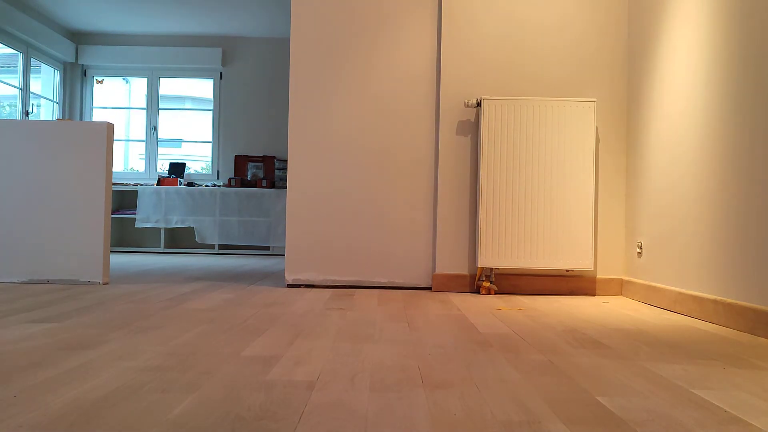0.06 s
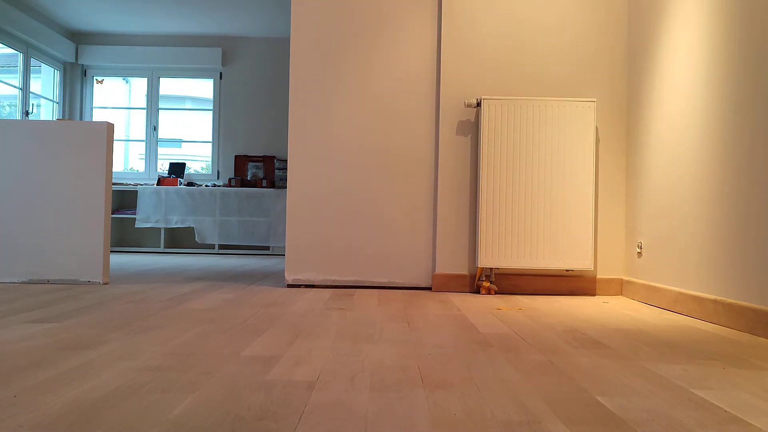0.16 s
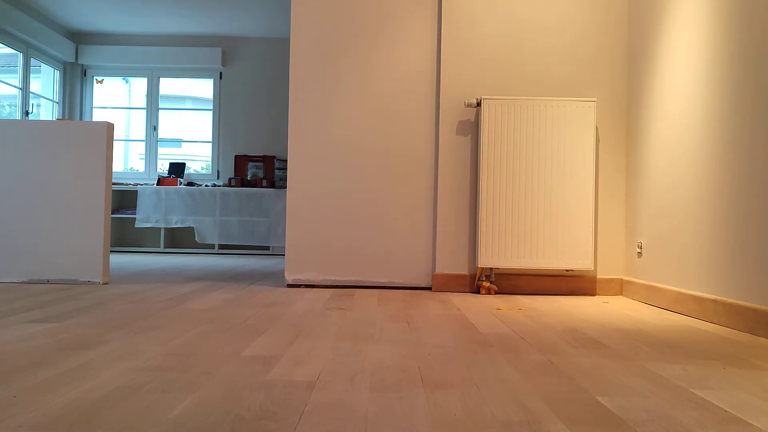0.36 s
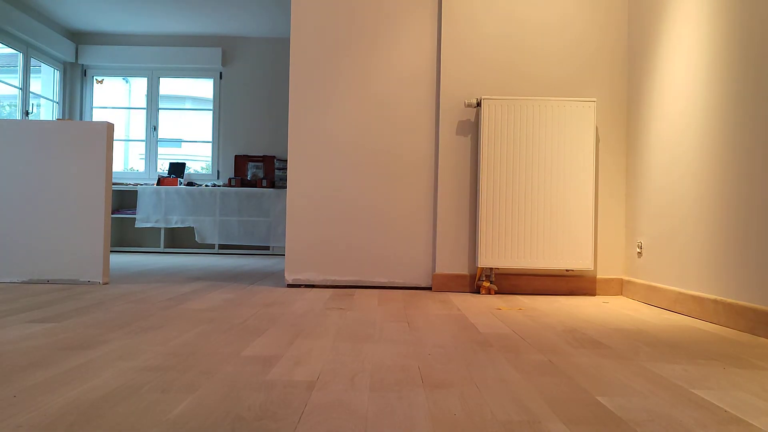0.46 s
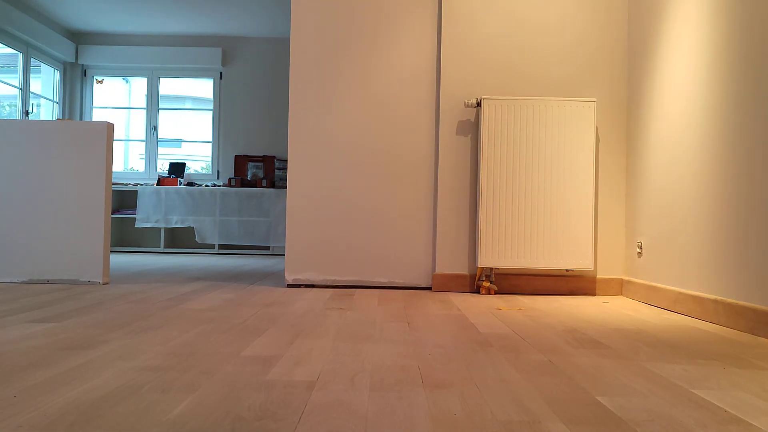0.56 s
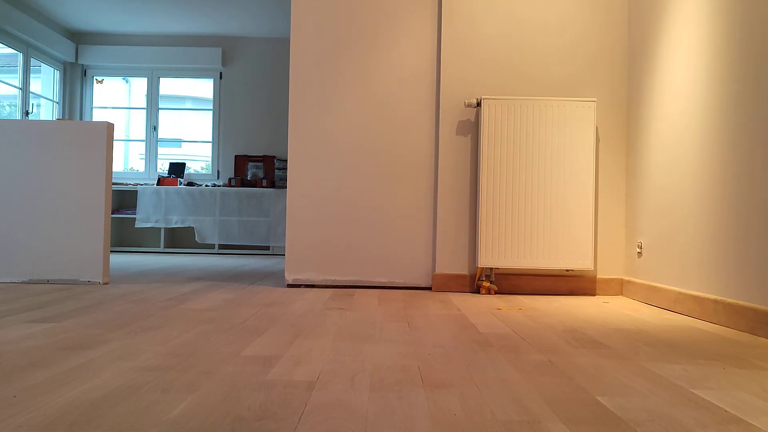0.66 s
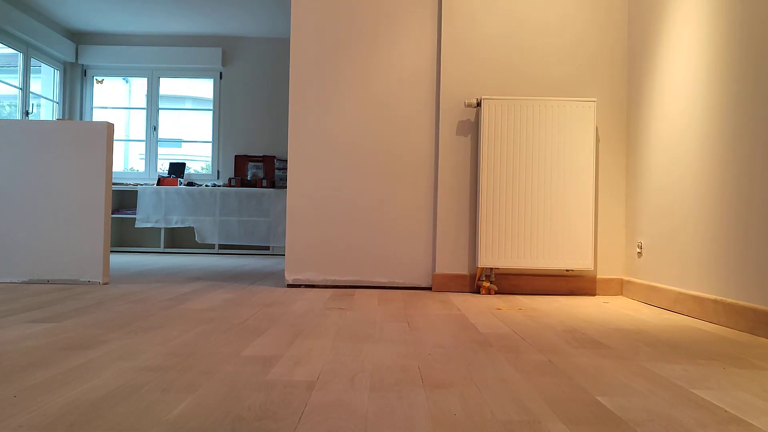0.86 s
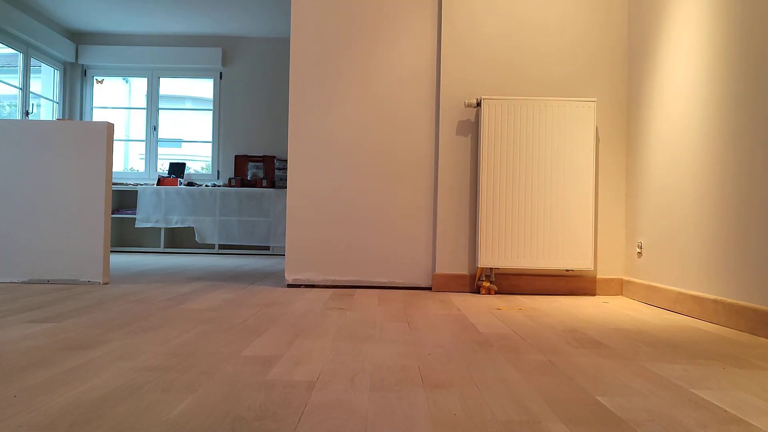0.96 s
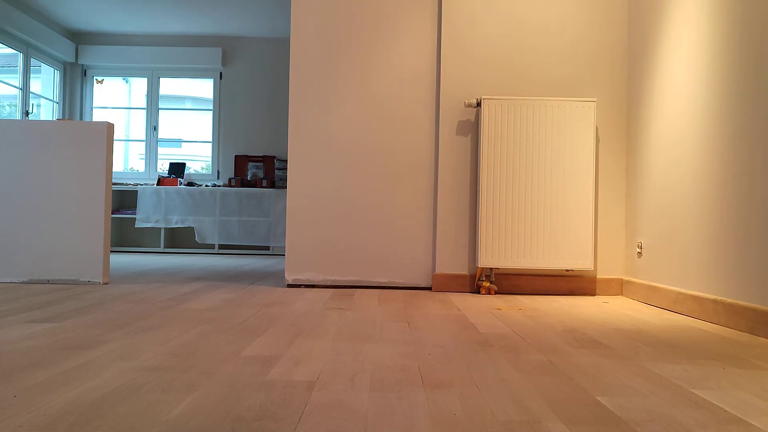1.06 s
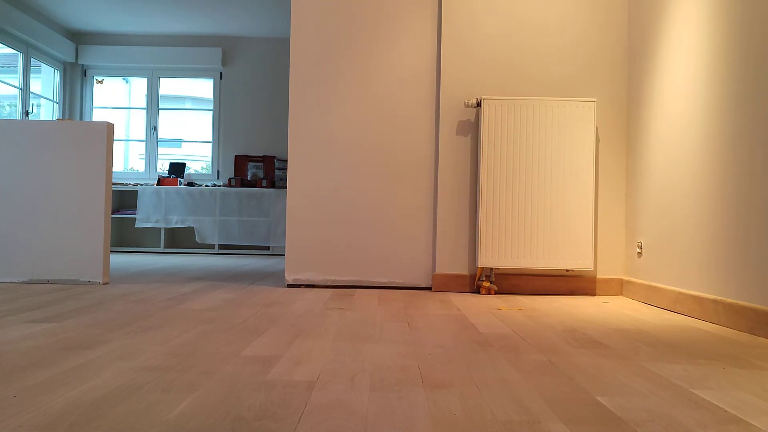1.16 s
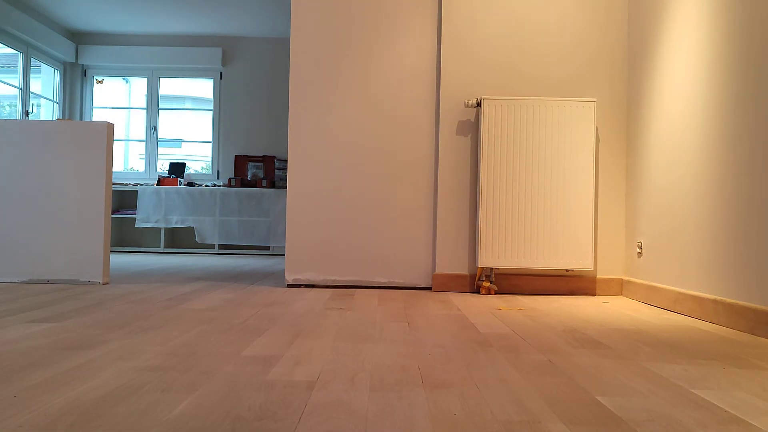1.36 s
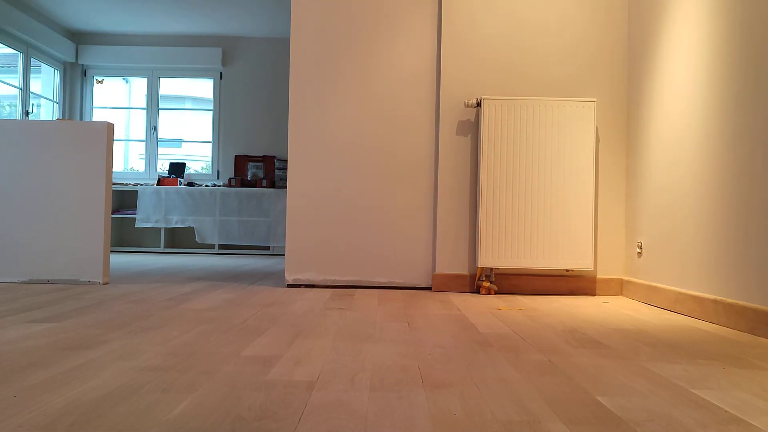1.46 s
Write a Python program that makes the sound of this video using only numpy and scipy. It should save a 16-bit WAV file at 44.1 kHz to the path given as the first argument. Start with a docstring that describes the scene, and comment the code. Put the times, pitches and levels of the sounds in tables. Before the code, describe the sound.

Three slow footsteps thud on a wooden floor in a bare, echoing room. The first is loudest, the second softer, with faint sole scuffs and one tiny creak. The microphones sit near the floor, the walker slightly left.

```python
"""Three slow footsteps on a wooden floor, in a bare, echoing room.
Each heel or sole knocks on the boards and sets the floor booming; the soles scuff and
the boards clack, tick and creak once under the load. Heard from two microphones near the floor,
18 cm apart, with the walker a little to the left. Behind the steps lie a quiet room hush and the
fading echo of an earlier step."""
import sys
import numpy as np
from scipy import signal
from scipy.fft import rfft, irfft
from scipy.io import wavfile

SR = 44100
rng = np.random.default_rng(int(sys.argv[2]) if len(sys.argv) > 2 else 0)


def transcribe(u):
    """Save the signal u as a 16-bit wav file named by the first command-line argument.

    u: samples, shape (n,) or (channels, n), limited to [-1, 1]; the rate is SR.
    q: integer samples, one column per channel.
    """
    v = np.clip(np.atleast_2d(u).T, -1, 1)
    q = np.round(v * 32767).astype(np.int16)
    wavfile.write(sys.argv[1], SR, q)


N = 66150
T = np.arange(N) / SR
HZ = np.maximum(np.fft.rfftfreq(2 * N, 1 / SR), 1)

# room tone: frequency_hz, density_db (power per Hz)
HUSH_SPECTRUM = [(20, -81), (40, -85), (80, -90.5), (170, -87.5), (330, -97.5), (650, -99.5), (1250, -102),
                 (2500, -106), (5000, -108.5), (7500, -109.5), (14000, -110)]
# the room's echo: frequency_hz, level_db (against the direct sound), t60_s
ECHO_BANDS = [(57.7, 5, 0.24), (142, -5, 1.41), (193, -1, 1.57), (259, 1, 1.7), (377, 2, 1.04),
              (690, 5.5, 1.62), (1270, 2, 1.18), (2350, 8, 1.2), (3360, 7.5, 1.27), (6200, 6, 0.76),
              (13800, 4, 0.5)]
# wooden clacks, a high tick and one creak: start_s, level_db, centre_hz, width_hz, decay_s
CLACKS_AND_CREAK = [(0.2486, -42, 1760, 447, 0.0028), (0.2503, -55.5, 6880, 550, 0.0031),
                    (0.641, -48, 1973, 592, 0.0056), (1.1860, -40.5, 1920, 690, 0.0046)]
# a sole slides: peak_s, level_db, rise_s, fall_s
SOLE_SCUFFS = [(0.252, -51, 0.0043, 0.0031), (0.356, -53, 0.034, 0.015), (0.642, -60.5, 0.05, 0.029),
               (0.685, -56, 0.013, 0.006), (0.785, -53, 0.038, 0.0063), (0.903, -61.5, 0.023, 0.0091),
               (1.214, -56, 0.012, 0.015), (1.281, -52, 0.0092, 0.0044), (1.419, -50, 0.0031, 0.0067)]
# colour of the sliding friction: frequency_hz, relative_db
FRICTION_SPECTRUM = [(150, 5), (500, -3.5), (1100, 1), (2400, -13), (4500, -14), (7500, -12),
                     (14000, -14.5)]
# the floor's modes: pitch_hz, relative_db, t60_s
FLOOR_RESONANCES = [(67, 0, 0.36), (89, 4, 0.66), (120, -7.5, 0.6), (143.4, 1, 0.56), (175.7, -0.5, 0.92),
                    (192.1, -3.5, 1.01), (209.6, -0.5, 0.65), (333.8, 0, 0.91), (361.6, 0, 0.57),
                    (397, -11.5, .4), (476, 0, 0.95), (530, -2.5, 0.46), (635, 6, 0.47), (907, -7, 0.33),
                    (1001, -3, 0.56)]
# a heel or sole lands, each level relative within its column: start_s, push_db, push_hardness_hz,
# board_db, board_pitch_hz, board_t60_s, boom_db, boom_hardness_hz, boom_low_edge_hz, tick_db
LANDINGS = [ (0.2480, -29, 390, -20.5, 158, 0.041, -39, 216, 44, -39),
            (0.3235, -60, 300, -26.5, 138, 0.03, -50, 151, 108, -69),
            (0.3490, -40.5, 470, -33, 263, 0.036, -64, 205, 103, -39.5),
            (0.3770, -42.5, 357, -22.5, 115, 0.025, -54, 123, 60, -69),
            (0.481, -54, 440, -32, 186, 0.034, -61, 182, 101, -69),
            (0.6771, -45, 584, -38, 423, 0.027, -45.5, 238, 214, -53),
            (0.7990, -60, 302, -36.5, 96, 0.056, -46.5, 62.5, 85.4, -66),
            (0.8048, -50, 536, -47, 590, 0.021, -74, 403, 394, -76),
            (1.1852, -35.5, 460, -29.5, 251, 0.013, -45.5, 86, 80, -38),
            (1.2790, -48, 422, -39, 253, 0.022, -66, 213, 79, -45.5),
            (1.415, -52.5, 1100, -56, 590, 0.027, -66, 196, 100, -47)]
# treble colour of the left and right microphone ports: frequency_hz, gain_db
LEFT_MIC_COLOUR = [(3000, 1), (4200, -1.5), (8700, 0), (9700, -9), (10800, -8.5), (12500, -6)]
RIGHT_MIC_COLOUR = [(3000, 1.5), (5800, -0.5), (7200, 2), (8500, -6), (10200, -10), (12500, -5.5)]

MIC_SPACING_M, RIGHT_LAG_S = 0.18, 0.000268
PAN_DB, PAN_ABOVE_HZ = 8.5, 4600   # the bass reaches both microphones alike
LINGER_DB, LINGER_HZ, LINGER_T60_S = -62, 276, 0.86
ECHO_BUILD_S, BOOM_ECHO_DB, CLACK_ECHO_DB = 0.00031, -14, -9
FLOOR_LOW_HZ = 51   # the floor radiates little below this
STRIKE_SPREAD_DB = -2.5   # each blow meets each mode a little differently
PUSH_LOW_HZ, PUSH_TOP_HZ = 148, 1900   # the rubber sole rounds off the top
TICK_DECAY_S, TICK_TOP_HZ = 0.0014, 9200


def from_db(db):
    """Decibels to gain."""
    return 10 ** (np.asarray(db) / 20)


def rms_one(x):
    """Scale to an rms of one."""
    return x / np.sqrt(np.mean(x ** 2) + 1e-20)


def at_hz(points, hz, column=1):
    """Read a column of a table along log frequency."""
    table = np.array(points)
    return np.interp(np.log(hz), np.log(table[:, 0]), table[:, column])


def shape(x, response):
    """Filter by a frequency response."""
    return irfft(rfft(x, 2 * N) * response)[..., :N]


def cut(x, kind, hz, order=2):
    """Butterworth high-pass or low-pass."""
    return signal.sosfilt(signal.butter(order, hz, kind, fs=SR, output="sos"), x + 1e-18)


def since(start_s):
    """Time since a moment, zero before it."""
    return np.maximum(T - start_s, 0)


def ring(start_s, hz, t60_s):
    """A sine that starts at a moment and dies away."""
    age = since(start_s)
    return np.exp(-np.log(1000) * age / t60_s) * np.sin(2 * np.pi * hz * age)


def grains(spread_db, length_s):
    """A gain that wanders at random from grain to grain."""
    wander = np.interp(T / length_s, np.arange(N), rng.standard_normal(N))
    return rms_one(from_db(spread_db * wander))


def diffuse_noise():
    """White noise arriving from all sides: alike at both microphones in the bass only."""
    alike = .98 * np.sinc(2 * HZ * MIC_SPACING_M / 343)
    mid, side = shape(rng.standard_normal((2, N)), np.sqrt([(1 + alike) / 2, (1 - alike) / 2]))
    return np.array([mid + side, mid - side])


def room_tone():
    """The room's steady hush and the last of an earlier step's echo."""
    hush = shape(diffuse_noise(), from_db(at_hz(HUSH_SPECTRUM, HZ)) * np.sqrt(SR / 2))
    linger = rms_one(shape(diffuse_noise(), np.exp(-np.log(HZ / LINGER_HZ) ** 2)))
    return hush + from_db(LINGER_DB) * linger * np.exp(-np.log(1000) * T / LINGER_T60_S)


def room_response():
    """Frequency response of the bare room: dense, uneven reflections, each band dying at its own rate."""
    edges = np.geomspace(40, 18000, 15)
    reflections = rfft(diffuse_noise() * grains(spread_db=1, length_s=0.00026), 2 * N)
    build = 1 - np.exp(-T / ECHO_BUILD_S)
    echo = np.zeros((2, N))
    for low, high in zip(edges, edges[1:]):
        hz = np.sqrt(low * high)
        band = irfft(reflections * ((HZ >= low) & (HZ < high)))[:, :N]
        envelope = build * np.exp(-np.log(1000) * T / at_hz(ECHO_BANDS, hz, column=2))
        echo += from_db(at_hz(ECHO_BANDS, hz)) * band * envelope / np.sqrt(np.sum(envelope ** 2))
    return rfft(echo, 2 * N)


def clacks_and_creak():
    """Wooden clacks and a high tick as a heel lands, and one brief creak, each ringing in a narrow band."""
    out = np.zeros(N)
    for start_s, level_db, centre_hz, width_hz, decay_s in CLACKS_AND_CREAK:
        band = np.exp(-((HZ - centre_hz) / width_hz) ** 2)
        ringing = rms_one(shape(rng.standard_normal(N), band))
        out += from_db(level_db) * ringing * (T > start_s) * np.exp(-since(start_s) / decay_s)
    return out


def sole_scuffs():
    """Grainy friction swells and dies as a sole slides."""
    level = np.zeros(N)
    for peak_s, level_db, rise_s, fall_s in SOLE_SCUFFS:
        level += from_db(level_db) * np.exp(-np.maximum(peak_s - T, 0) / rise_s - since(peak_s) / fall_s)
    friction = rng.standard_normal(N) * grains(spread_db=2, length_s=0.0012)
    return level * rms_one(shape(friction, from_db(at_hz(FRICTION_SPECTRUM, HZ))))


def floor_booms():
    """The floor's modes ring in alternating senses after each landing."""
    out = np.zeros(N)
    for start_s, *_, boom_db, hardness_hz, low_edge_hz, _ in LANDINGS:
        for k, (hz, mode_db, t60_s) in enumerate(FLOOR_RESONANCES):
            # a soft landing misses the high modes, a light one the deep ones
            reach = 1 / (1 + (hz / hardness_hz) ** 2) / (1 + (low_edge_hz / hz) ** 6)
            level = from_db(boom_db + mode_db + STRIKE_SPREAD_DB * rng.standard_normal())
            out += (-1) ** k * reach * level * ring(start_s, hz, t60_s)
    return cut(out, "high", FLOOR_LOW_HZ, order=4)


def foot_knocks():
    """Each landing is a short push with a tick on top, and the struck board swings a few times."""
    push, board, tick_level = np.zeros((3, N))
    for start_s, push_db, hardness_hz, board_db, board_hz, board_t60_s, *_, tick_db in LANDINGS:
        age = since(start_s)
        progress = 2 * np.pi * hardness_hz * age   # the push peaks at 1
        push -= from_db(push_db) * progress * np.exp(1 - progress)
        onset = 1 - np.exp(-2 * board_hz * age)
        board -= from_db(board_db) * onset * ring(start_s, board_hz, board_t60_s)
        tick_level += from_db(tick_db) * (T > start_s) * np.exp(-age / TICK_DECAY_S)
    tick = shape(tick_level * rng.standard_normal(N), 1 / (1 + 1j * HZ / TICK_TOP_HZ))
    push = cut(push, "low", PUSH_TOP_HZ)
    push = cut(push, "high", PUSH_LOW_HZ)
    return cut(2 * push + board + tick / 2, "high", FLOOR_LOW_HZ, order=4)


def scene():
    """The steps reach the microphones from a little to the left, followed by the room, over the hush."""
    background, room, scuffs = room_tone(), room_response(), sole_scuffs()
    contact = foot_knocks() + scuffs
    booms, clacks = floor_booms(), clacks_and_creak()
    pan_db = PAN_DB * HZ / (HZ + PAN_ABOVE_HZ)
    right_lag = np.exp(-2j * np.pi * HZ * RIGHT_LAG_S)
    arrival = np.array([from_db(pan_db), from_db(-pan_db) * right_lag])
    direct = shape(contact + booms + clacks, arrival)
    echo = shape(contact + from_db(BOOM_ECHO_DB) * booms + from_db(CLACK_ECHO_DB) * clacks, room)
    return direct + echo + background


def record(dry):
    """Each microphone's port colours the treble; the very top is cut steeply."""
    ports = from_db([at_hz(LEFT_MIC_COLOUR, HZ), at_hz(RIGHT_MIC_COLOUR, HZ)])
    low_pass = 1 / np.sqrt(1 + (HZ / 14350) ** 300)
    return shape(dry, ports * low_pass)


dry = scene()
out = record(dry)
transcribe(out)
```